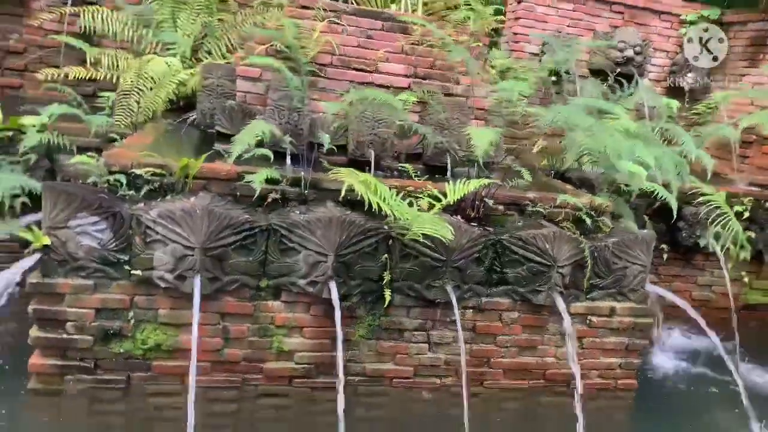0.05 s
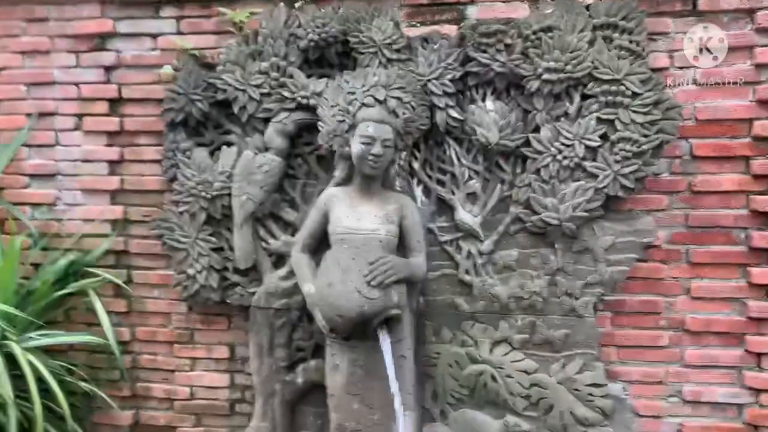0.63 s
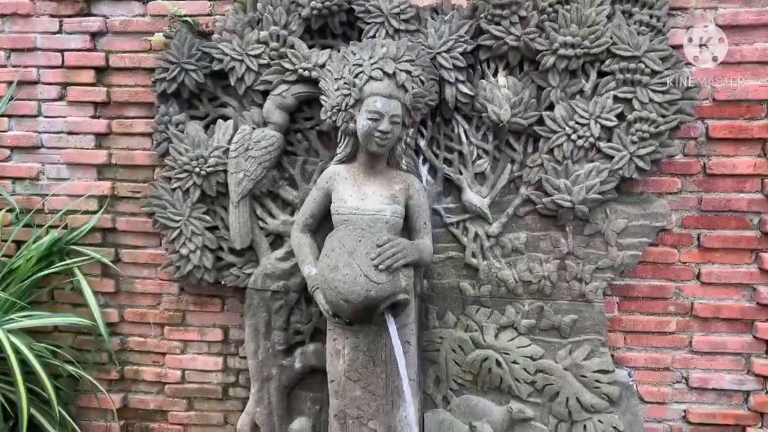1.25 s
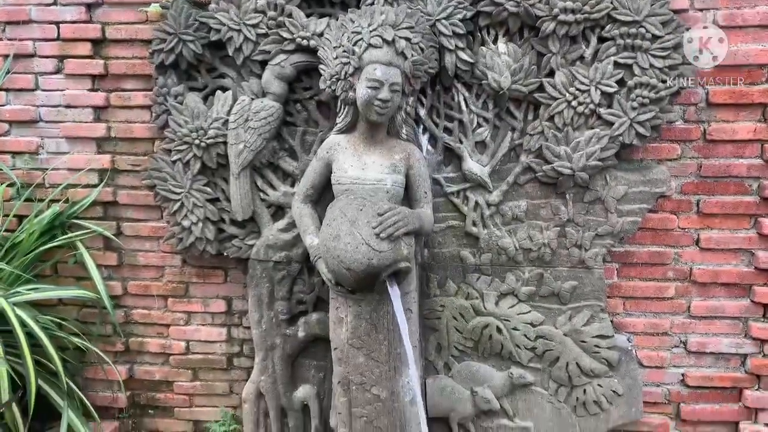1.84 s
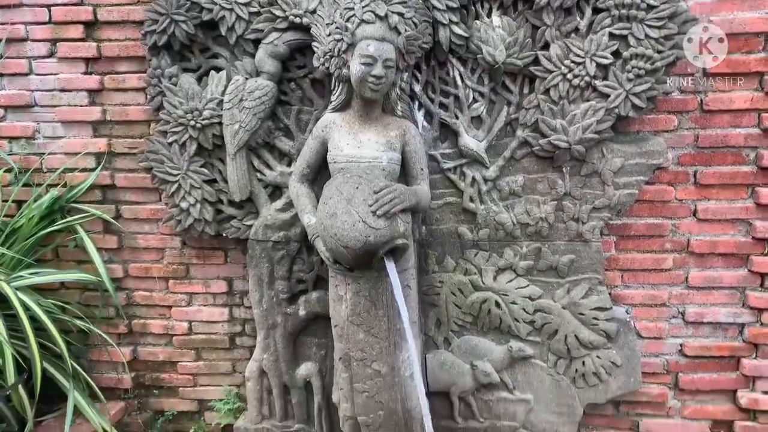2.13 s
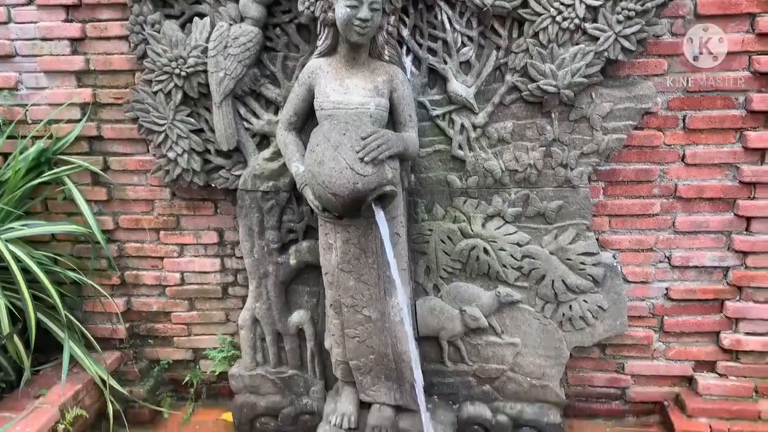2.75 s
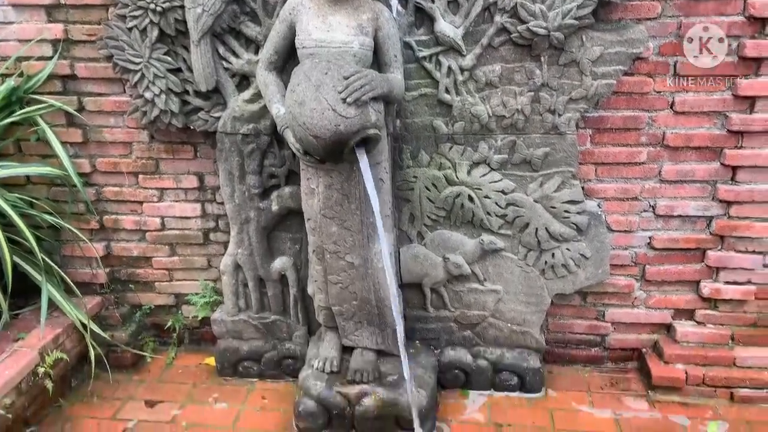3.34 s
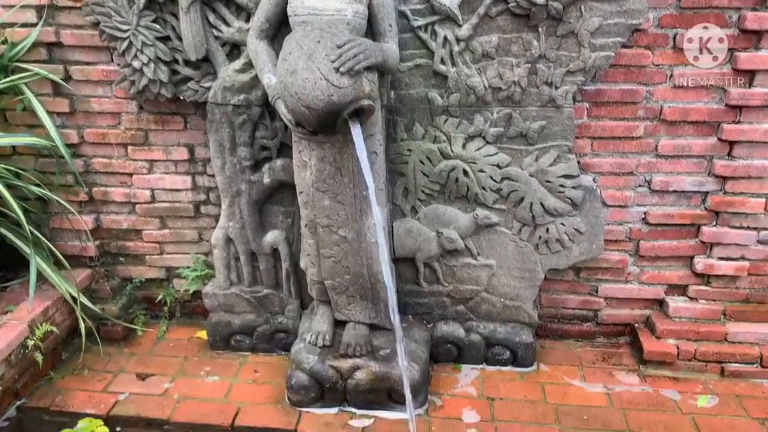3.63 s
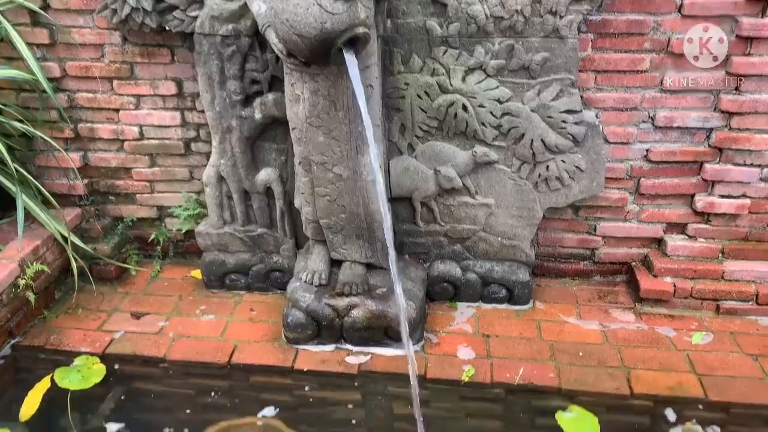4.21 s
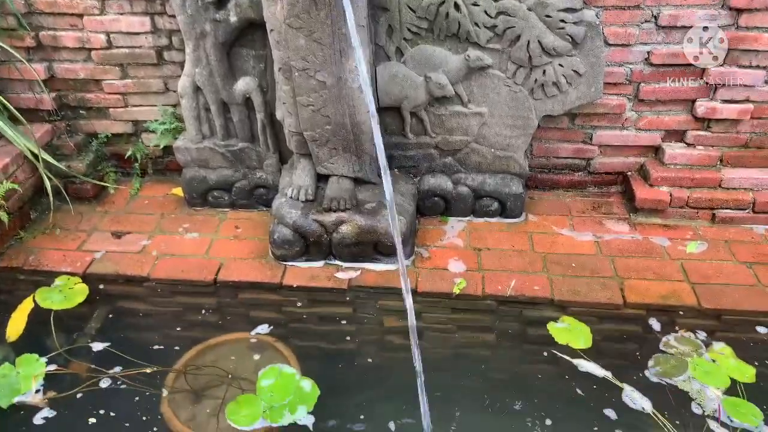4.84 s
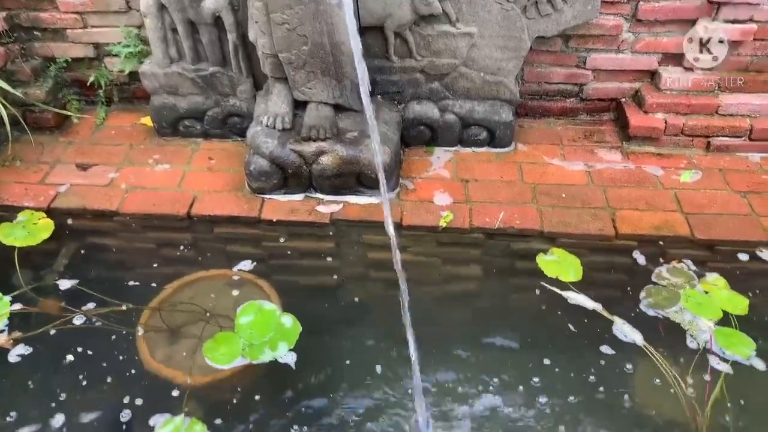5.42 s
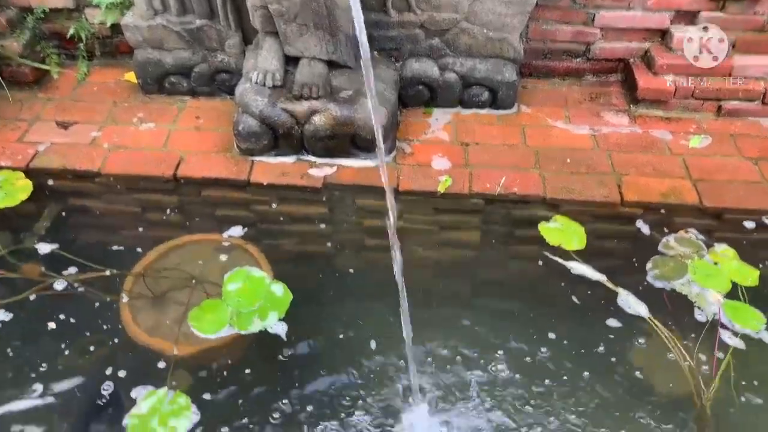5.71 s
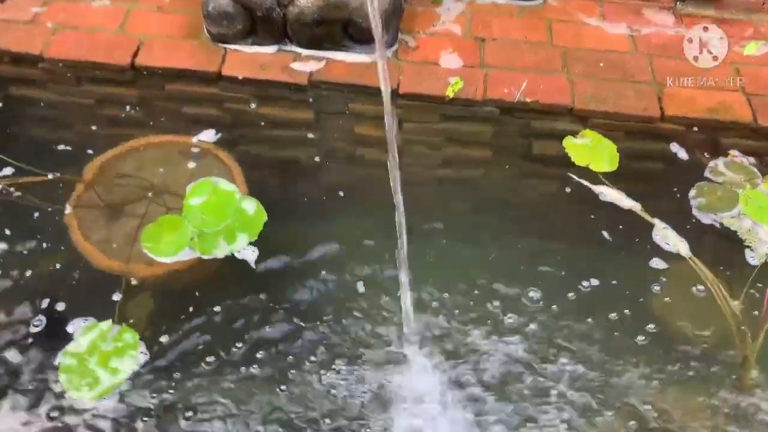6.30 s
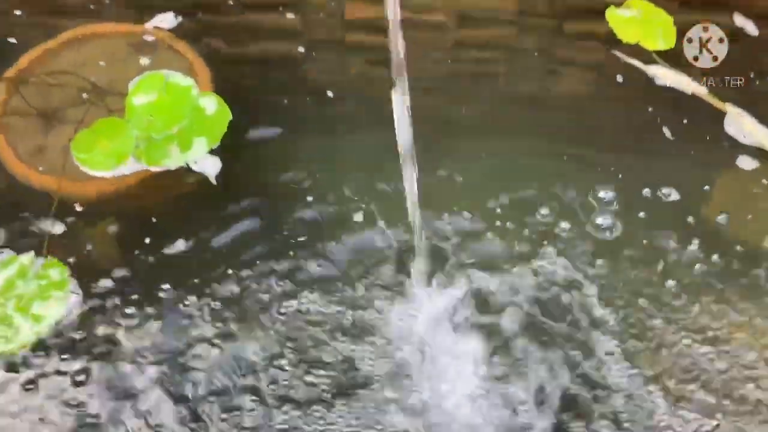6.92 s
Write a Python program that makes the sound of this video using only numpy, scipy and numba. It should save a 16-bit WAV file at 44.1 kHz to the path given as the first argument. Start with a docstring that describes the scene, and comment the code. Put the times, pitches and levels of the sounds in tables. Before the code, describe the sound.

A thin jet of water falls from a stone spout into a garden pond, splashing and bubbling steadily. The sound drops out for an instant just after the start, then returns. Small ringing plips, soft low thumps and fine ticking spray run throughout, over a faint rush from farther spouts. Near the end the microphone moves close above the splash, where drops smack sharply and air pockets plop.

```python
"""Steady splashing and bubbling: a thin jet falls from a stone spout into a garden pond by a brick wall.
The jet breaks into lumps that thump pockets of air under the surface, shed bursts of ringing bubbles
and throw fine spray. Near drops smack the water, and other spouts wash further off.
The sound fades out and in once near the start, and the microphone ends close above the splash."""
import sys
import numpy as np
from scipy import signal
from scipy.fft import rfft, irfft
from scipy.io import wavfile
from scipy.ndimage import uniform_filter1d
from numba import njit

SR = 44100
rng = np.random.default_rng(int(sys.argv[2]) if len(sys.argv) > 2 else 0)


def materialize(psi):
    """Save the field psi as 16-bit PCM at rate SR to the path in sys.argv[1].

    A 1-D psi becomes a single channel; in a 2-D psi each row is a channel.
    """
    bounded = np.clip(np.atleast_2d(psi).T, -1, 1)
    quanta = np.round(bounded * 32767).astype(np.int16)
    wavfile.write(sys.argv[1], SR, quanta)


N = 315756
TIME = np.arange(N) / SR
FREQS = np.fft.rfftfreq(N, 1 / SR)


def lumps():
    """Heavy lumps in the jet swell and die away, lifting the plunge, bubbling and spray (in dB)."""
    # Each row: time in seconds, then the lift in dB of the plunge, the bubbling and the spray.
    landings = [(.06, 1.5, 1.5, -1), (.395, 4, 0.5, 6), (0.714, 9.5, 4.5, 5), (.815, 0, 0, -2),
                (.895, 4.5, 0, 0), (1.452, 0, 1.5, 3), (1.745, 3, 5.5, 0.5), (1.905, 2, 2.5, 2.5),
                (1.963, 2.5, 5, -0.5), (2.116, 6, 3, 6.5), (2.399, 2, -1, 3), (3.03, 8, 4.5, -4),
                (3.33, -0.5, 4.5, 1.5), (3.758, 2, 3, -4), (3.885, 1, 2, 3), (3.945, -3, 3.5, 2),
                (4.013, 7, 0, -2), (4.515, 7, 1.5, -6), (4.615, 2.5, 2.5, 0), (4.68, 5, 1.5, -2),
                (4.73, 5.5, 4.5, 1), (4.87, 1.5, -1, -0.5), (5.0, 1, 3, -3), (5.167, 1.5, 1.5, 1),
                (5.58, 2.5, -1, 1.5), (5.635, 2.5, -3, -3), (5.745, 1, -1.5, 1), (6.03, -3, 0.5, 3),
                (6.092, 1, 1.5, -2), (6.2, 1, 0, 4), (6.26, 2, 3, 2.5), (6.475, 3.5, 3.5, 5),
                (6.52, 0, 4.5, 4.5), (6.618, 10.5, 8.5, 0), (6.984, 5, 6, 6), (7.087, 6, 4, 6)]
    rows = np.array(landings)
    peak_s, lifts_db = rows[:, :1], rows[:, 1:]
    age = TIME - peak_s
    # Heard from close by, after 6.4 s, a lump stops short as the surface slaps shut.
    rise_s, fall_s = 0.025, np.where(peak_s > 6.4, 0.008, 0.028)
    return lifts_db.T @ np.exp(-(age / np.where(age < 0, rise_s, fall_s)) ** 2)


def plunge(level_db, surge):
    """The jet drives large, quickly damped air pockets under the surface."""
    # Each row: frequency in Hz, gain in dB.
    tone = [(20, -33), (35, -8.5), (50, -2.5), (85, -0.5), (110, -2.5), (150, 2), (200, -5), (290, -5.5),
            (450, -15), (800, -29)]
    pockets = colour(swarm(28.56, 807, cycles=1.7, spread_db=0.77, count=6000), curve(tone))
    return widen(unit_rms(pockets)) * gain_of(level_db + 0.57 + 0.16 * surge)


def bubbling(level_db, surge):
    """Short-lived bubbles burst all over the churned surface."""
    # Each row: frequency in Hz, gain in dB.
    tone = [(250, -17), (450, 0), (750, 4), (1100, 2.5), (1600, 1), (2100, -2.5), (2800, -12), (4200, -30),
            (5500, -22), (8000, -11)]
    swarms = [swarm(314.7, 5510, cycles=4.2, spread_db=4.0, count=6000) for _ in range(3)]
    at_jet, left, right = (unit_rms(colour(foam, curve(tone))) for foam in swarms)
    pond = gain_of(-3.5) * widen(at_jet) + np.array([left, right])
    return unit_rms(pond) * gain_of(level_db - 1.13 + 1.55 * surge + 0.25 * churn(5, 36))


def gurgle(level_db, surge):
    """The jet drives bubbles deep, and some ring longer."""
    # Each row: frequency in Hz, gain in dB.
    tone = [(400, -16), (600, -9), (700, -12), (900, -2.5), (1250, 1), (1550, 2.5), (2200, 4), (3000, -0.5),
            (3800, -1), (4500, 0.5), (5500, -10.5)]
    quick = unit_rms(swarm(509, 5440, cycles=2.0, spread_db=0.5, count=7000))
    ringing = unit_rms(swarm(925, 4237, cycles=17.6, spread_db=0.5, count=600))
    deep = unit_rms(colour(quick + gain_of(-2) * ringing, curve(tone)))
    deep *= gain_of(level_db - 5.2 + .5 * surge + 1.1 * churn(15, 45))
    return deep + garden(deep, tail_db=-14, scatter_db=-16)


def spray(level_db, surge):
    """Thousands of tiny droplets tick on the water each second, most of them near the jet."""
    # Each row: frequency in Hz, gain in dB.
    tone = [(800, 0), (2500, 9.5), (4000, 4), (5500, 7), (6800, 3.5), (8000, 5.5), (10500, 6.5),
            (14300, 2.5), (15000, -17), (16000, -34)]
    ticks_per_s, left_lag = 4400, 12  # a steady lag in samples widens the spray
    chance, size = rng.random((2, 3, N))
    ticks = (chance < ticks_per_s / SR) * rng.choice([-1, 1], (3, N))
    sizes = gain_of(4.0 * np.minimum(-np.log(size), 5))
    at_jet, left, right = colour(ticks * sizes, curve(tone))
    mist = np.array([np.roll(at_jet, left_lag), at_jet]) + gain_of(-4) * np.array([left, right])
    flutter_db = 1.1 * surge + 1.05 * churn(12, 90)
    return unit_rms(mist) * gain_of(level_db + 3.0 + flutter_db)


def plips():
    """A lump of water traps one large bubble amid a short flurry of smaller, higher ones."""
    # Each row: start in seconds, relative level in dB, pitch in Hz.
    loud_bubbles = [(.008, -20, 1450), (.668, -21, 1005), (.70, -23, 1240), (.76, -20, 1660),
                    (.81, -20, 1600), (.885, -17, 1480), (.893, -20, 1640), (.909, -19, 1480),
                    (.935, -21, 1620), (.988, -20, 1450), (1.092, -27, 1050), (1.234, -23, 1690),
                    (1.302, -23, 1480), (1.363, -19.5, 1500), (1.45, -18.5, 1460), (1.717, -28, 1520),
                    (1.739, -15, 3170), (1.778, -16, 1080), (1.961, -26, 1490), (1.966, -22, 1240),
                    (2.111, -18, 2210), (2.186, -18, 1790), (2.351, -11, 3910), (2.396, -12.5, 1640),
                    (2.403, -19, 1480), (2.652, -20, 1620), (2.734, -16, 2420), (2.802, -23, 1214),
                    (3.02, -19, 1660), (3.234, -24, 1230), (3.243, -20, 1580), (3.329, -15.5, 2420),
                    (3.495, -17, 2460), (3.551, -21, 1216), (3.729, -12, 3750), (3.754, -20, 2210),
                    (3.759, -16, 1605), (3.818, -12.5, 3830), (3.935, -16, 1270), (3.948, -23, 2660),
                    (3.952, -20, 1440), (4.009, -20, 1590), (4.014, -15, 2180), (4.25, -23, 2210),
                    (4.256, -24, 874), (4.259, -22, 1234), (4.607, -19, 2200), (4.63, -20, 850),
                    (4.631, -31, 1660), (4.662, -10.5, 3280), (4.718, -19, 1450), (4.863, -19, 2630),
                    (4.997, -18.5, 2230), (5.02, -20, 830), (5.102, -28, 1450), (5.122, -19.5, 790),
                    (5.16, -16, 1420), (5.169, -16.5, 1650), (5.214, -18, 2030), (5.44, -20.5, 1750),
                    (5.566, -21, 930), (5.578, -12.5, 2200), (5.737, -15, 2760), (5.812, -19, 1630),
                    (5.911, -19, 1400), (5.916, -17, 2200), (5.965, -19, 1660), (6.026, -16, 1970),
                    (6.088, -15, 1640), (6.244, -21, 1040), (6.258, -20, 1440), (6.264, -16, 2120),
                    (6.305, -24, 804), (6.363, -11, 3130), (6.475, -13, 2520), (6.515, -11, 3600),
                    (6.577, -14, 1940), (6.604, -13, 1590), (6.969, -23, 1570), (7.025, -19, 933),
                    (7.075, -20, 1570), (7.088, -16.5, 1340), (7.09, -15, 2840)]
    start, db, hz = np.vstack([loud_bubbles, stray_plips()]).T
    large = ring(start, hz, gain_of(db - .3), cycles=6.5 + hz / 1000, rise=.003)
    delay, pitch, size = rng.standard_normal((len(start), 3, 12)).transpose(1, 0, 2)
    starts = np.clip(start[:, None] + 0.001998 + .011 * delay, 0, None).ravel()
    pitches = fold_pitch(hz[:, None] * np.exp(0.098 + .28 * pitch)).ravel()
    sizes = gain_of(db[:, None] - 6.5 + 1.8 * size).ravel()
    flurry = ring(starts, pitches, sizes, cycles=np.full(starts.size, 2.5), rise=0.0064)
    plip = large + flurry
    return colour(plip, 0.9 * ringing_db() - 11.5) + garden(plip, tail_db=-17, scatter_db=-17)


def stray_plips():
    """Lesser bubbles come at random, the higher ones a little louder: rows of start, level and pitch."""
    per_s, low_hz, high_hz = 13, 1156, 3700
    base_db, spread_db, db_per_octave = -27.5, 7, 1
    when, pitch, size = rng.random((200, 3)).T
    start = (np.arange(len(when)) + when) / per_s
    octaves = pitch * np.log2(high_hz / low_hz)
    db = base_db + db_per_octave * octaves + spread_db * (2 * size - 1)
    return np.transpose([start, db, low_hz * 2 ** octaves])


def drops():
    """Each near drop smacks the surface with a sharp crack and a lower slap, both a short burst of fizz."""
    # Each row: start in seconds, relative level of the crack and of the slap in dB.
    smacks = [(1.39, -20, -38), (1.595, -28, -33), (1.831, -24, -35), (2.116, -29, -30), (2.899, -22, -34),
              (2.943, -24, -35), (3.021, -25, -34), (3.3295, -28, -20), (4.335, -23, -30),
              (4.995, -23, -29), (5.0499, -23, -31), (5.9283, -14.5, -34), (6.2673, -21, -34),
              (6.293, -25, -23), (6.52, -26, -14.5), (6.607, -25, -20), (6.6168, -17.5, -12),
              (6.687, -27, -32), (6.6925, -23.5, -36), (6.981, -24, -17), (6.9912, -22, -13),
              (7.0237, -19.5, -32), (7.0315, -28, -34), (7.0897, -29, -13)]
    t, hits = TIME[:400], np.zeros((2, N))
    for start, crack_db, slap_db in smacks:
        fizz = .4 * rng.choice([-1, 1], (2, len(t))) * np.exp(-t / .0012)
        first = round((start + .001) * SR)
        hits[:, first:first + len(t)] += gain_of([[crack_db + 8.0], [slap_db + 6.0]]) * fizz
    # Each pair: frequency in Hz, gain in dB.
    crack_tone = [(500, -31), (3000, -11), (5500, 3.5), (10000, 6.5), (13000, 5.5), (14500, 4.0),
                  (16000, -20)]
    slap_tone = [(300, -7), (1200, 1), (3500, -10.0), (5500, 7.5), (12000, -13)]
    smack = colour(hits[0], curve(crack_tone)) + colour(hits[1], curve(slap_tone))
    return widen(smack) + garden(smack, tail_db=-16, scatter_db=-12)


def spatters():
    """A lump shatters into a quick cluster of tiny, bright bubbles."""
    # Each row: time in seconds, relative level of each bubble in dB, middle pitch in Hz.
    clusters = [(.466, -34, 3330), (.658, -33.5, 3700), (.888, -32.5, 3020), (.958, -32, 4200),
                (1.044, -35, 3480), (1.086, -33, 4400), (1.451, -34, 3420), (1.745, -31, 3900),
                (1.953, -35, 4000), (2.116, -28.5, 4500), (2.351, -32, 4130), (2.493, -35, 3700),
                (2.829, -33, 4240), (3.259, -33, 3600), (3.321, -33, 3320), (3.34, -33, 3960),
                (3.733, -31, 3900), (3.885, -29.5, 4130), (4.018, -32.5, 4140), (4.083, -35, 3940),
                (4.316, -35, 4100), (4.336, -33, 3700), (4.783, -32, 4060), (5.317, -31, 3160),
                (5.355, -31.5, 3700), (5.517, -30, 3200), (5.743, -31, 3500), (6.294, -30.5, 2970),
                (6.481, -38, 3500), (6.521, -30, 3860), (6.561, -36, 2880), (6.613, -29, 3380),
                (6.846, -34, 2950), (6.977, -31, 4180), (6.989, -36, 3600)]
    count, spread_s, spread_octaves = 24, .005, .25
    when, db, hz = np.transpose(clusters)[:, :, None]
    delay, pitch = rng.standard_normal((len(when), 2, count)).transpose(1, 0, 2)
    starts = (when + spread_s * delay).ravel()
    pitches = fold_pitch(hz * 2 ** (spread_octaves * pitch)).ravel()
    sizes = np.repeat(gain_of(db + 2.8), count)
    burst = ring(starts, pitches, sizes, cycles=np.full(starts.size, 2.5), rise=0.015)
    return gain_of(-1) * widen(burst) + garden(burst, tail_db=-4.5, scatter_db=-5)


def gulps():
    """A big air pocket collapses with a low plop, and the surface slaps shut over it."""
    # Each row: start in seconds, relative level in dB, pitch of the plop in Hz.
    pockets = [(.05, -19, 700), (.394, -21, 130), (4.008, -26, 148), (4.719, -37, 151), (5.625, -23.5, 295),
               (5.745, -24, 260), (6.244, -23, 158), (6.293, -21, 229), (6.621, -15.5, 127),
               (6.7035, -11.5, 660), (6.718, -18, 317), (6.981, -15.5, 920), (7.002, -21, 139),
               (7.029, -15, 630), (7.086, -24, 800)]
    start, db, hz = np.transpose(pockets)
    each, slap_hz = np.ones(len(start)), 480
    plop = ring(start, hz, gain_of(db - 5.0), cycles=1.56 * each, rise=0.025)
    slap = ring(start + 0.00073, slap_hz * each, gain_of(db - 3.5), cycles=0.92 * each, rise=0.037)
    return widen(plop + slap) + garden(plop + slap, tail_db=-8, scatter_db=-24)


def wash():
    """The far spouts blur into an even rush from all sides."""
    # Each row: frequency in Hz, gain in dB.
    tone = [(30, -19), (100, 4.5), (155, 0), (220, 2), (450, 3), (850, -3), (2000, -0.5), (3500, -2),
            (6000, -5), (14000, -5.5), (15500, -35)]
    return gain_of(-35.5) * unit_rms(colour(rng.standard_normal((2, N)), curve(tone)))


def ringing_db():
    """Fixed ringing pitches, as a curve in dB over frequency."""
    # Each row: centre in Hz, width in Hz, relative lift in dB.
    peaks = [(624, 60, 8.5), (770, 60, 3), (875, 80, 6.5), (1055, 85, 7.5), (1212, 110, 6.8),
             (1465, 85, 9.5), (1625, 105, 9), (1785, 70, 6), (1900, 100, 2), (2050, 90, 5),
             (2220, 100, 8.3), (2420, 130, 5), (2630, 130, 3), (3180, 110, 3)]
    return sum(db * np.exp2(-(2 * (FREQS - hz) / width) ** 2) for hz, width, db in peaks)


def centre_ringing(x):
    """Fixed ringing pitches colour the centre of the stereo sound, with thinner bands between them."""
    lift_db, centre = ringing_db(), x.mean(0)
    ripple_db = lift_db - uniform_filter1d(lift_db, size=2800)
    return x - centre + colour(centre, 0.91 * ripple_db)


def hollow(x):
    """A narrow band of the water's sound thins out and fills again."""
    # Each row: time in seconds, gain at the middle of the band in dB.
    dip = [(.3, -4), (1.6, -0.5), (2.35, -9.5), (3.2, -4.5), (5.6, -2.5), (6.6, -7)]
    centre_hz, width_hz = 661, 115
    band = irfft(rfft(x) / (1 + (2 * (FREQS - centre_hz) / width_hz) ** 2), N)
    return x - band * (1 - gain_of(envelope(dip)))


def garden(x, tail_db, scatter_db):
    """Echoes only: quick scatter from water and stone, and a short tail from the walls."""
    # Each row: frequency in Hz, seconds the tail takes to fall by 60 dB.
    decay_times = [(100, 0.042), (1000, 0.098), (4000, 0.063), (14000, 0.0039)]
    t = TIME[:SR // 3]
    hz, age, noise = signal.stft(rng.standard_normal((2, len(t))), SR, nperseg=256)
    decay = gain_of(-60 * age / curve(decay_times, hz)[:, None])
    tail = signal.istft(noise * decay, SR, nperseg=256)[1][:, :len(t)]
    tail *= np.minimum(t / 0.007, 1)
    scatter = rng.standard_normal((2, len(t))) * np.exp(-t / 0.012) * (t > .0005)
    echoes = gain_of(tail_db) * unit_rms(tail) + gain_of(scatter_db) * unit_rms(scatter)
    return signal.oaconvolve(x[None], echoes / np.sqrt(len(t)), axes=1)[:, :N]


def widen(x):
    """A tiny delay between left and right widens the sound, flips early and vanishes near the end."""
    # Each row: time in seconds, samples by which the left channel trails the right.
    channel_lag = [(.2, -13), (.26, 13), (5.3, 11), (6.0, 0)]
    lag = np.round(envelope(channel_lag)).astype(int)
    return np.array([x[(np.arange(N) - lag) % N], x])


@njit
def ring(starts, pitches, sizes, cycles, rise):
    """Each bubble is a sine that swells quickly, dies over a few cycles and rises in pitch."""
    out = np.zeros(N)
    for k in range(len(starts)):
        first = int(starts[k] * SR)
        for i in range(min(int(5 * cycles[k] * SR / pitches[k]), N - first)):
            turns = i * pitches[k] / SR
            age = turns / cycles[k]
            amplitude = sizes[k] * min(2 * age, 1.) * np.exp(-age)
            out[first + i] += amplitude * np.sin(2 * np.pi * turns * (1 + rise * age))
    return out


def swarm(low_hz, high_hz, cycles, spread_db, count):
    """Bubbles of random time, pitch and size, with equal power per Hz."""
    when, pitch, size, life = rng.random((count, 4)).T
    hz = low_hz * (high_hz / low_hz) ** pitch
    sizes = hz * gain_of(spread_db * np.minimum(-np.log(size), 4))
    return ring(when * N / SR, hz, sizes, cycles * (.5 + life), rise=0.016)


def fold_pitch(hz, top_hz=4840):
    """Pitches above that of the smallest clear bubble fold back below it."""
    return np.minimum(hz, top_hz ** 2 / hz)


def churn(slow_hz, fast_hz):
    """Random unsteadiness between two rates, rms 1."""
    band = FREQS / (FREQS + slow_hz) / np.sqrt(1 + (FREQS / fast_hz) ** 4)
    return unit_rms(irfft(rfft(rng.standard_normal(N)) * band, N))


def colour(x, db):
    """Filters by a gain in dB for every frequency."""
    return irfft(rfft(x) * gain_of(db), N)


def curve(points, hz=FREQS):
    """Joins (Hz, value) points on a log frequency axis."""
    point_hz, value = np.transpose(points)
    return np.interp(np.log(hz + 1), np.log(point_hz + 1), value)


def envelope(points):
    """Joins (seconds, value) points with straight lines."""
    return np.interp(TIME, *np.transpose(points))


def gain_of(db):
    return 10 ** (np.asarray(db) / 20)


def unit_rms(x):
    return x / np.sqrt(np.mean(x ** 2) + 1e-20)


def scene():
    """The jet breaks into lumps, whose surges drive plunge, bubbles and spray together."""
    # The water sounds louder in the opening moment, then from 0.4 s the microphone slowly nears it. Each row:
    # time in seconds, lift of the bubbling in dB.
    nearness = [(0.0, 4.5), (.15, 1), (.4, 0), (2.6, 0.13), (5.6, 1), (6.4, 1.4), (7.16, 2)]
    near_db = envelope(nearness)
    deep_db, foam_db, fine_db = lumps()
    surge = churn(4, 18)
    pocket_delay_s = 0.012  # the air pockets sound just after a lump lands
    plunge_db = -38.5 + 0.87 * near_db + np.interp(TIME - pocket_delay_s, TIME, deep_db)
    bubbling_db = -38.5 + near_db + foam_db
    spray_db = -41.5 + 2.13 * near_db + fine_db + 1.3 * churn(5, 21)
    jet = plunge(plunge_db, surge) + bubbling(bubbling_db, surge)
    jet += gurgle(bubbling_db, surge) + spray(spray_db, surge)
    water = hollow(centre_ringing(jet + wash()))
    balance = gain_of([[-.3], [.3]])
    return (water + drops() + plips() + spatters() + gulps()) * balance


def record(dry):
    """The sound fades out, rests and fades back in; a steep low-pass trims the highest treble."""
    fade_out_s, fade_in_s, cutoff_hz = (.1, .21), (.266, .385), 16200
    closing = np.interp(TIME, fade_out_s, [1, gain_of(-60)])
    opening = gain_of(np.interp(TIME, fade_in_s, [-17.5, 0]))
    faded = dry * np.where(TIME < fade_in_s[0], closing, opening)
    lowpass = signal.firwin(511, cutoff_hz, window=("kaiser", 9), fs=SR)
    return signal.oaconvolve(faded, lowpass[None], "same")


dry = scene()
out = record(dry)
materialize(out)
```